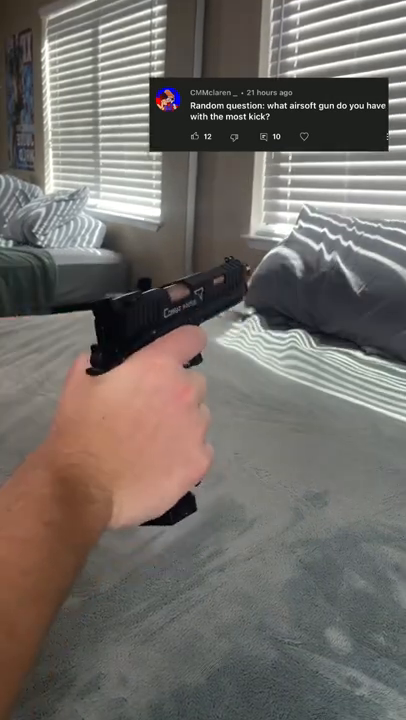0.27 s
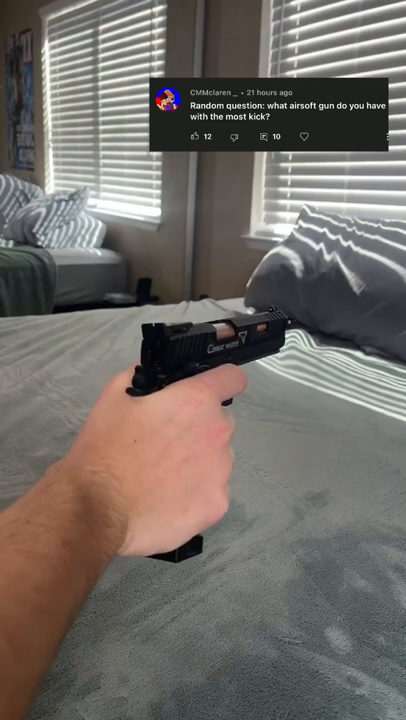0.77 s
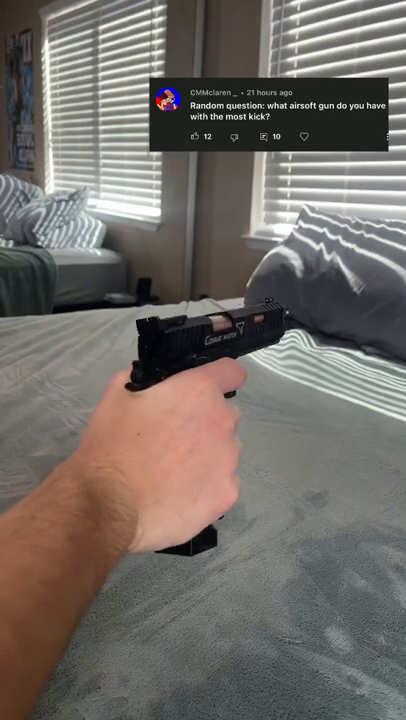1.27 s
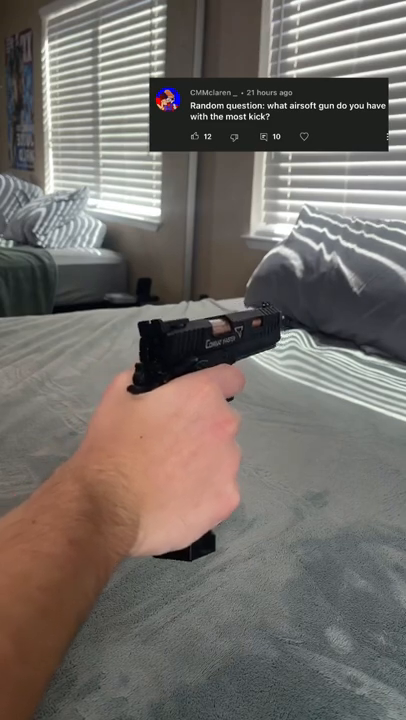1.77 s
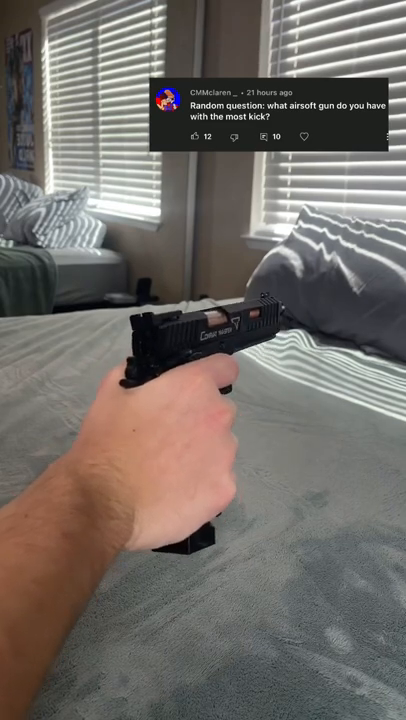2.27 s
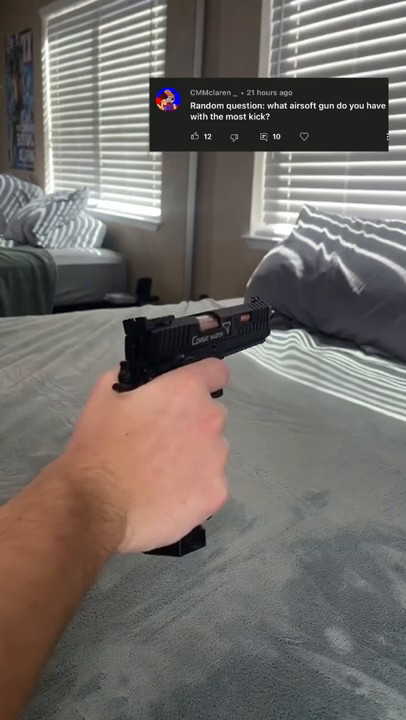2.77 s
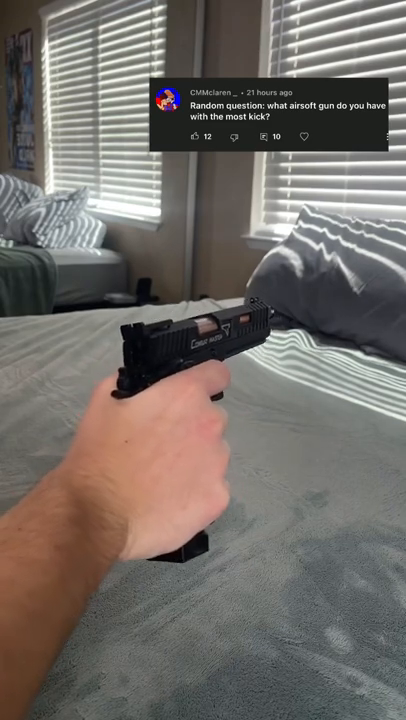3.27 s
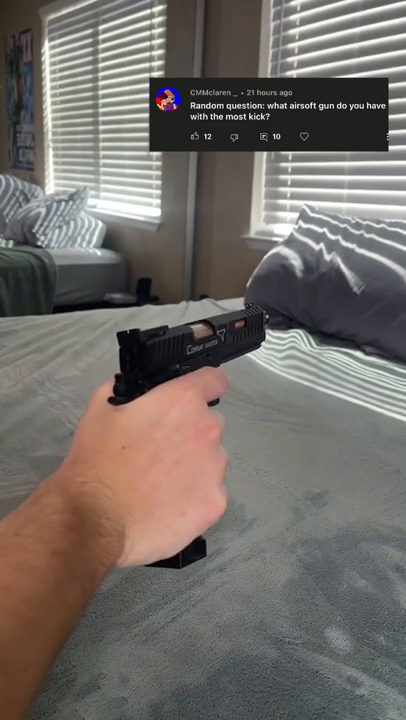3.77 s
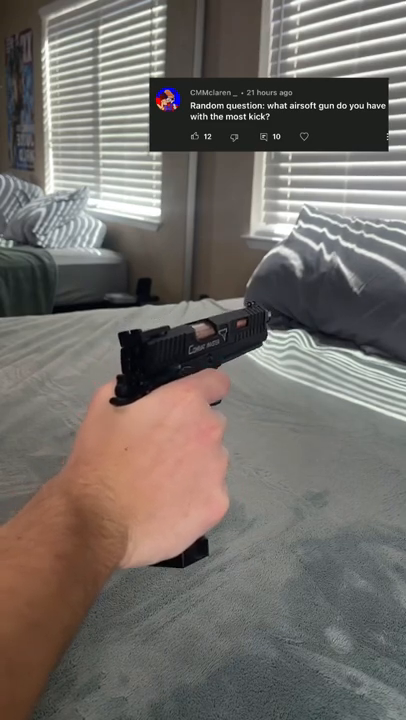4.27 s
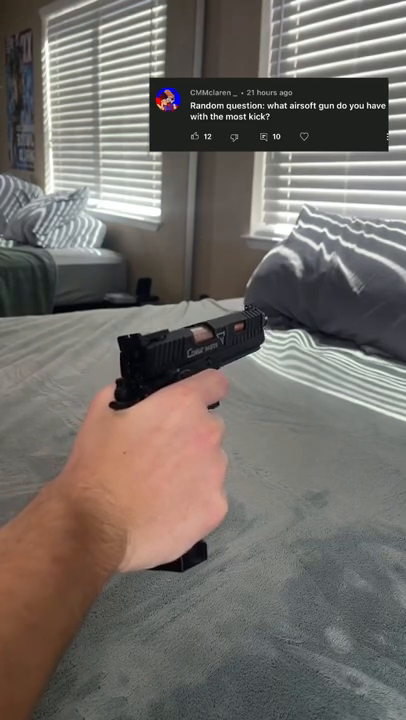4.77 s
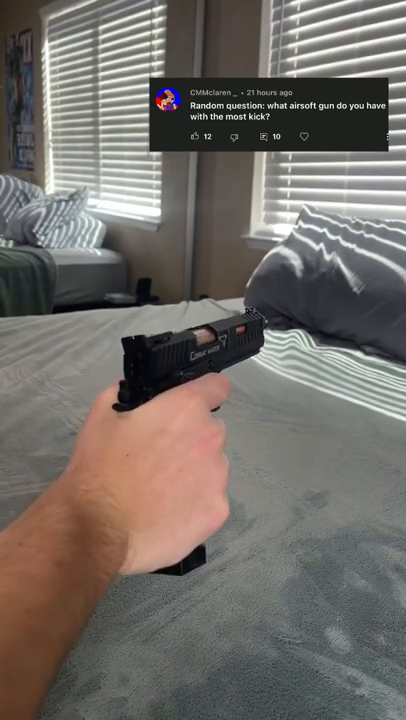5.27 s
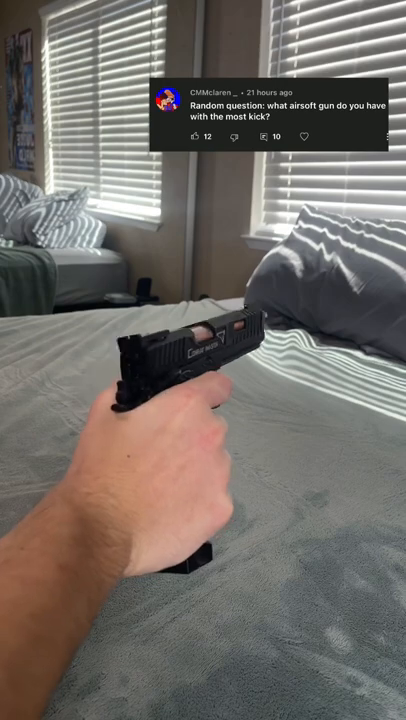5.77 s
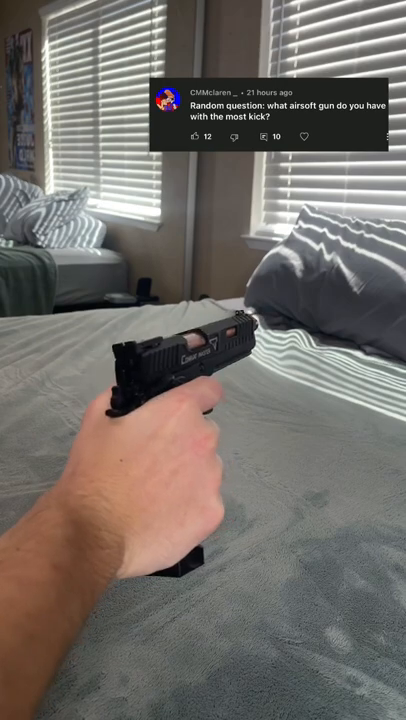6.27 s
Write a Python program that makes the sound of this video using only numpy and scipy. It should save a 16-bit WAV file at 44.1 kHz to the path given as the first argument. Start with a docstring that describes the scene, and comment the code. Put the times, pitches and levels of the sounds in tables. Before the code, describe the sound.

A gas-powered toy pistol is cocked close to the microphone, its slide snapping forward with a metallic clack. After a short pause it fires fifteen single shots that gradually speed up. Each is a sharp pop and tiny hiss of gas with the clack of the slide hitting back and slamming home. Faint trigger ticks fall between shots, and the small room adds a short echo.

```python
"""In a small room, over a bed and close to a phone, a gas-powered toy pistol is cocked and fired 15 times.
A hand pulls back the slide (the moving top of the gun) and lets go; the trigger and small parts tick.
In each shot the hammer clacks, gas hisses and pops out, and the slide hits its rear stop and slams home.
Some puffs of gas strike the microphone and dull it for a moment; a low thump comes as each spell ends.
A faint hush and a deep, wavering hum lie underneath."""
import sys
import numpy as np
from scipy import signal
from scipy.fft import rfft, irfft, next_fast_len
from scipy.io import wavfile

SR = 44100
rng = np.random.default_rng(int(sys.argv[2]) if len(sys.argv) > 2 else 0)


def file_out(sig):
    """Save sig as 16-bit WAV at sys.argv[1]."""
    # one column per channel
    cols = np.atleast_2d(sig).T
    # limit, then scale
    lim = np.clip(cols, -1, 1)
    pcm = np.round(lim * 32767).astype(np.int16)
    wavfile.write(sys.argv[1], SR, pcm)


N = 286650
LEAD = 4410  # extra samples before time zero, so the pull of the slide can echo into the opening
TOTAL = N + LEAD


def amp(db):
    return 10 ** (np.asarray(db) / 20)


def read(points, hz):
    """Looks up a frequency in a table, joining its rows smoothly along a pitch scale."""
    f, value = np.transpose(points)
    return np.interp(np.log(hz + 1), np.log(f + 1), value)


def shape(x, response):
    """Filters a sound; response gives the gain at each frequency."""
    size = next_fast_len(x.shape[-1] + 8192)
    return irfft(rfft(x, size) * response(np.fft.rfftfreq(size, 1 / SR)), size)[..., :x.shape[-1]]


def noise(response):
    """Two unrelated filtered noises with an average (rms) size of 1."""
    x = shape(rng.standard_normal((2, TOTAL)), response)
    return x / x.std()


def add(mix, s, sound):
    """Lays a sound into the mix at s seconds."""
    part = mix[round(s * SR) + LEAD:][:len(sound)]
    part += sound[:len(part)]


# Tone of the still air: (frequency [Hz], level [dB])
HUSH_TONE = [(35, -32.5), (60, -3.5), (107, 0), (160, -11.5), (309, -12.5), (470, -17), (735, -24),
             (950, -22.5), (1340, -31.5), (2200, -33), (4000, -39), (6000, -45.5), (12000, -56.5),
             (15000, -85.5)]
# How loud the hush is: (time [s], level [dB])
HUSH_LEVELS = [(0, -75), (.28, -70.5), (.4, -61.5), (1.1, -60.5), (1.3, -66), (2.0, -71), (3, -74.5),
               (4.2, -77.5), (5, -80.5), (6.5, -76)]
# How loud the hum is: (time [s], level [dB])
HUM_LEVELS = [(0, -81.5), (.38, -83.5), (.54, -68), (1.1, -65.5), (1.4, -69.5), (1.83, -75.5), (2.3, -69),
              (2.8, -73), (3.2, -67.5), (3.7, -68), (4.1, -80), (4.5, -64.5), (4.69, -42.5), (4.98, -81),
              (5.36, -59.5), (5.55, -68.5), (5.75, -67.5), (6.2, -71.5)]

def air():
    """The room's hush, and a hum that wavers because it is a narrow band of noise near 50 Hz."""
    t = (np.arange(TOTAL) - LEAD) / SR
    hush = amp(np.interp(t, *np.transpose(HUSH_LEVELS))) * noise(lambda hz: amp(read(HUSH_TONE, hz)))
    hum = amp(np.interp(t, *np.transpose(HUM_LEVELS))) * noise(lambda hz: 1 / (1 + ((hz - 50) / 9) ** 2))
    return hush + hum


# Kinds of clack: (low part [dB], fade time [s], ringing [dB]). A fade time is how long a 60 dB drop takes.
HAND, HAMMER, VALVE = (-12.5, .018, -6), (-12.5, .024, .2), (-8, .025, 1.5)
REAR, HOME, LIGHT = (-14, .022, -4), (-14, .031), (-9.5, .03, .2)  # each shot sets the ringing of HOME
# The slide pulled back and let go by hand: (time [s], level [dB])
COCKING = [(-.077, 0.5), (.094, -23), (0.109, -9.5), (0.1225, -6.5), (.126, -4.5), (0.129, -7.5)]
# The shots, with delays counted from the hammer: (time [s], hammer [dB], first push of air [dB],
# pop delay [s], pop [dB], pop length [s], pop rebound [0-1], valve [dB],
# rear stop delay [s], rear stop [dB], slide home delay [s], slide home [dB], its ringing [dB])
SHOTS = [(1.1493, -18, -5, .0098, -3, 0.0011, 0.5, -6, .0178, -24, .0684, -5.5, -14.5),
         (1.687, -12.5, -17, .0127, -5.5, 0.00051, 0.5, -11, .022, -22, .0643, -8.5, -0.5),
         (2.1515, -15.5, -16, .0131, -8, .0006, .9, -16, .0201, -9.5, .0556, -14, 7.5),
         (2.5861, -9.5, -16.5, .0115, -5.5, .00029, 1, -13.5, .021, -11, .0553, -12, 5.5),
         (3.028, -7.5, -16.5, .011, -9, 0.00032, 0.4, -11.5, 0.023, -11.5, .0548, -10.5, 6),
         (3.42, -13, -18.5, .013, -10, .00074, 0.7, -11.5, .0203, -9, .054, -11.5, 3.5),
         (3.8317, -8, -15.5, .0117, -9, 0.0007, .6, -12, .022, -8.5, .0555, -10.5, 5),
         (4.2251, -11, -17.5, .0127, -6.5, 0.00042, 1, -10, .023, -9.5, .0563, -9, 2.5),
         (4.5423, -10.5, -20.5, .0127, -7.5, 0.00042, .7, -8, .0234, -11.5, 0.0558, -8.5, 3),
         (4.8813, -7, -20.5, .0142, -7.5, .00069, 0, -5, .024, -19, .067, -9.5, -1),
         (5.1654, -6.5, -18, .0134, -7, .00035, .6, -10.5, .0233, -8, .0575, -7, 2),
         (5.447, -9.5, -18, .013, -5.5, .00037, 1, -16, 0.0233, -7, .0582, -9, 8),
         (5.7219, -10, -14.5, .0158, -8.5, 0.00033, .3, -14.5, .0263, -6.5, .0615, -10, -2),
         (6.0426, -10.5, -18.5, .0162, -2.5, .0008, .8, -9.5, .025, -15.5, .0698, -7.5, -14),
         (6.3406, -7.5, -16, .0166, -8, 0.00038, .84, -9, 0.029, -8.5, .0595, -8.5, 8.5)]

def clacks():
    """Lists every metal hit as (time [s], level [dB], low part [dB], fade time [s], ringing [dB])."""
    hits = [(s, db, *HAND) for s, db in COCKING]
    for s, hammer_db, _, pop, _, _, _, valve_db, rear, rear_db, home, home_db, ring_db in SHOTS:
        hits += [(s, hammer_db, *HAMMER),
                 (s + pop - .0026, valve_db, *VALVE),  # just before the pop
                 (s + rear, rear_db, *REAR),
                 (s + home - .015, home_db - 15, *LIGHT),  # the slide catches the next pellet
                 (s + home, home_db, *HOME, ring_db),
                 (s + home + .012, home_db - 13, *LIGHT)]  # and bounces once
    return hits


def rattle(hits, rise_s):
    """Loudness over time of hits (time [s], level [dB], fade time [s]): each jumps up, then dies away."""
    power, t = np.zeros(TOTAL), np.arange(4000) / SR
    for s, db, fade in hits:
        add(power, s, (amp(db - 60 * t / fade) * (1 - np.exp(-t / rise_s))) ** 2)
    return np.sqrt(power)


# Tone of metal hitting metal: (frequency [Hz], level [dB])
METAL_TONE = [(350, -49.5), (700, -28.5), (2200, 4.5), (3040, -0.5), (4800, -7.5), (6800, -7), (8900, -3),
              (11000, -2.5), (13000, -23.5)]
# Notes the slide and frame ring at: (frequency [Hz], when cocked [dB], when fired [dB], fade time [s])
METAL_NOTES = [(1850, -12, -16, .04), (2090, -11, -23, .13), (2630, -14, -4, .018), (3060, -13, -3, .022),
               (4290, -9, -19, .08), (5800, -12, -16, .04), (6850, -8, -12, .025), (10700, -10, -13, .012)]
CLACK_RISE_S, COCKED_BY_S, RING_DB = .0009, .6, -18.5

def slide_and_hammer():
    """Each metal hit is a burst of noise, split high and low, and also sets the slide and frame ringing."""
    hits = clacks()
    high = rattle([(s, db, fade) for s, db, _, fade, _ in hits], CLACK_RISE_S)
    low = rattle([(s, db + low_db, fade) for s, db, low_db, fade, _ in hits], CLACK_RISE_S)
    knock = rattle([(s, db + low_db + ring_db, .012) for s, db, low_db, _, ring_db in hits], .00016)
    low_share = lambda hz: 1 / (1 + (hz / 4500) ** 6)
    grit = amp(2.05 * np.repeat(rng.standard_normal(TOTAL // 16 + 1), 16)[:TOTAL])  # uneven tiny contacts
    metal = high * noise(lambda hz: amp(read(METAL_TONE, hz)) * (1 - low_share(hz)))
    metal += low * noise(lambda hz: amp(read(METAL_TONE, hz)) * low_share(hz))
    knocks = knock * rng.standard_normal((2, TOTAL))
    by_hand = np.arange(TOTAL) < LEAD + COCKED_BY_S * SR
    t = np.arange(8000) / SR
    for hz, hand_db, fired_db, fade in METAL_NOTES:
        ring = amp(-60 * t / fade) * np.sin(2 * np.pi * hz * t)
        struck = knocks * amp(np.where(by_hand, hand_db, fired_db) + RING_DB)
        metal += signal.oaconvolve(struck, ring[None], axes=1)[:, :TOTAL]
    return metal * grit


# How long the room's echo lasts: (frequency [Hz], fade time [s])
ECHO_FADES = [(100, 0.078), (300, 0.18), (800, 0.49), (2000, 0.53), (5000, 0.53), (9000, 0.45),
              (13000, 0.28)]
# Tone of the echo: (frequency [Hz], level [dB])
ECHO_TONE = [(100, -6.5), (300, -2.5), (700, -4), (1100, -2), (2500, -3), (6000, -0.5), (9000, -6),
             (11000, -0.5), (12500, -12), (14000, -26)]

def room_echo(x):
    """Many small reflections at random times; each pitch dies away at its own speed."""
    taps = np.zeros((2, SR))
    at = np.arange(100, SR - 20, 20) + rng.integers(0, 20, (2, (SR - 101) // 20))
    np.put_along_axis(taps, at, rng.choice([-1., 1.], at.shape), 1)
    hz, t, bands = signal.stft(taps, SR, nperseg=256)
    early = amp(12 - 60 * t / .23)  # bedding soaks up the first echoes fast
    late = amp(-60 * (t / read(ECHO_FADES, hz)[:, None]) ** 1.25)  # falls faster towards the end
    tail = signal.istft(bands * (early + late) * amp(read(ECHO_TONE, hz))[:, None], SR, nperseg=256)[1]
    return signal.fftconvolve(x, tail / np.linalg.norm(tail[0]), axes=1)[:, :TOTAL]


# Ticks of the trigger and small parts: (time [s], level [dB], top frequency [Hz])
TRIGGER_TICKS = [(0.4375, -50, 3000), (0.9932, -61, 2500), (1.0292, -46.5, 9000), (1.064, -61, 5000),
                 (1.6282, -50.5, 9000), (2.0966, -48.5, 9000), (2.547, -45, 11000), (2.9868, -46.5, 11000),
                 (3.374, -49, 11000), (3.8, -46, 11000), (4.186, -48.5, 11000), (4.831, -58.5, 11000),
                 (6.0065, -53, 11000)]

def trigger():
    """Small parts tick: tiny bursts of noise, each with its own brightness."""
    out, t = np.zeros((2, TOTAL)), np.arange(1300) / SR
    for s, db, top_hz in TRIGGER_TICKS:
        band = signal.butter(2, [900, top_hz], "band", fs=SR)
        tick = signal.lfilter(*band, rng.standard_normal((2, len(t))))
        loudness = amp(db - 60 * t / .014) * (1 - np.exp(-t / .00011))
        for side in (0, 1):
            add(out[side], s, loudness * tick[side] / tick.std())
    return out


# Tone of the escaping gas: (frequency [Hz], level [dB])
GAS_TONE = [(200, -23), (600, -4), (2000, -2), (5000, -3.5), (9000, -0.5), (11500, -4.5), (13500, -9)]
BEFORE_HAMMER_S, AFTER_POP_S = .006, .0015  # the valve is open between these two moments
HISS_DB, COOLING_DB_PER_SHOT = -18.5, -.3654

def gas_hiss():
    """Gas hisses while the valve is open, a little weaker each shot as the tank cools."""
    flow = np.zeros(TOTAL)
    for shot, (s, _, _, pop, *_) in enumerate(SHOTS):
        open_s = BEFORE_HAMMER_S + pop + AFTER_POP_S
        progress = np.arange(0, 1.6, 1 / (open_s * SR))  # the valve shuts at 1
        opening = np.minimum(progress / .35, 1) ** 1.5
        closing = amp(-45 * np.maximum(progress - 1, 0))
        add(flow, s - BEFORE_HAMMER_S, amp(HISS_DB + shot * COOLING_DB_PER_SHOT) * opening * closing)
    return flow * noise(lambda hz: amp(read(GAS_TONE, hz)))


# Low, soft thumps, most of them as a dull spell ends: (time [s], strength [dB], length [s])
LOW_THUMPS = [(1.223, -25, .0021), (1.758, -27.5, 0.0031), (2.169, -15.5, .0036), (4.574, -19.5, 0.0079),
              (4.952, -24, 0.0033), (6.119, -25.5, 0.0032)]
# Tone of the pops and thumps: (frequency [Hz], level [dB])
PULSE_TONE = [(60, 2.5), (130, -1.5), (290, 3), (450, 1), (700, -4), (1050, 0.5), (1600, -1.5), (4000, 2.5)]
PUSH_DELAY_S, PUSH_LENGTH_S, PUSH_REBOUND = .0026, .00052, 1  # the first push of air, after the hammer
THUMP_REBOUND, REBOUND_STRETCH = .2, 3

def pops_and_thumps():
    """Single pulses: short ones pop, long ones thump. A slower rebound cancels some of the bass."""
    out, t = np.zeros(TOTAL), np.arange(3000) / SR
    pulses = [(s, db, length, THUMP_REBOUND) for s, db, length in LOW_THUMPS]
    for s, _, push_db, pop, pop_db, length, rebound, *_ in SHOTS:
        pulses += [(s + PUSH_DELAY_S, push_db, PUSH_LENGTH_S, PUSH_REBOUND),
                   (s + pop, pop_db, length, rebound)]
    for s, db, length, rebound in pulses:
        rise = 1 - np.exp(-t / (.18 * length))
        spring_back = rebound / REBOUND_STRETCH * np.exp(-t / (REBOUND_STRETCH * length))
        add(out, s, amp(db + 12) * rise * (np.exp(-t / length) - spring_back))
    return shape(out, lambda hz: amp(read(PULSE_TONE, hz)))


# Moments when a puff dulls the microphone: (time [s], length [s], dip in level afterwards [dB])
DULL_SPELLS = [(1.156, 0.071, -6.5), (1.698, 0.058, -15.5), (4.893, 0.06, -8), (6.06, 0.057, -11)]
# How much each pitch is dulled: (frequency [Hz], share of DULL_DB [0-1])
DULL_SHARES = [(300, 0.086), (1500, .4), (4400, 0.27), (5600, 0.67), (12000, 0.94)]
DULL_DB, RECOVERY_S = -26, .045

def dulled_microphone(x):
    """A hard puff cuts the high notes at once; afterwards the whole level dips and swells back."""
    hz, t, bands = signal.stft(x, SR, nperseg=128, noverlap=96)
    dull_db, dip_db = np.zeros((2, len(t)))
    for s, length, after_db in DULL_SPELLS:
        age = t - LEAD / SR - s
        dull_db += DULL_DB * np.clip(age / .0064, 0, 1) * np.clip((length - age) / .0055, 0, 1)
        dip_start = np.clip(1 + (age - length) / .0047, 0, 1)
        dip_db += after_db * dip_start * np.exp(-(abs(age - length) / RECOVERY_S) ** .79)
    bands = bands * amp(dull_db * read(DULL_SHARES, hz)[:, None] + dip_db)
    return signal.istft(bands, SR, nperseg=128, noverlap=96)[1][:, :TOTAL]


# How the phone's two microphone openings compare:
# (frequency [Hz], likeness [0-1], left ahead by [radians], left louder by [dB])
MIC_OPENINGS = [(0, .99, 0, 0), (125, .98, -.1, -.1), (250, .97, -.3, -.1), (500, .92, -.55, -.8),
                (1000, .76, -.5, -2.2), (1700, .95, -.15, -.3), (2300, .95, .2, -.5), (3200, .65, 1.0, -4),
                (4500, .7, 2.5, -1.5), (5200, .65, 4, 0), (5800, .97, 6.2, .8), (6300, .92, 6.5, .6),
                (7900, .88, 8.55, .4), (8900, .99, 9.42, .1), (9500, .97, 9.55, .2), (11000, .93, 11.2, 0),
                (12100, .95, 12.45, .1), (13600, .95, 12.55, 0), (14600, .7, 15.5, -.5)]

def left_and_right(pair, pulses):
    """The right opening hears partly the same sound as the left, slightly shifted. Both get the pulses."""
    f, likeness, ahead, louder_db = np.transpose(MIC_OPENINGS)
    alike = lambda hz: np.interp(hz, f, likeness)
    shift = lambda hz: np.exp(-1j * np.interp(hz, f, ahead)) * amp(-np.interp(hz, f, louder_db))
    right = shape(pair[0], alike) + shape(pair[1], lambda hz: np.sqrt(1 - alike(hz) ** 2))
    return np.array([pair[0] + pulses, shape(right + pulses, shift)])


def scene():
    """The gun and its echo, dulled now and then, with the air, pops and thumps added."""
    gun = slide_and_hammer() + trigger() + gas_hiss()
    pulses = pops_and_thumps()
    echo = amp(-10) * room_echo(gun) + amp(-13.5) * room_echo(np.array([pulses, pulses]))
    return left_and_right(dulled_microphone(gun + echo) + air(), pulses)[:, LEAD:]


# How the microphone loses the very highest notes: (frequency [Hz], level [dB])
MIC_TONE = [(11800, 1.48), (12600, -1.5), (13600, -15), (14500, -27), (16500, -40)]
BASS_CUT_HZ, TOP_HZ, SOFT_LIMIT = 70, 16500, .9

def record(dry):
    """The phone thins the bass, rounds off loud peaks and cuts the highest treble."""
    late_lows = lambda hz: np.exp(-7.5j * np.log((hz + 15) / 16000))  # turns a pop into a falling chirp
    wet = shape(dry, lambda hz: late_lows(hz) / (1 + (BASS_CUT_HZ / (hz + 1)) ** 2))
    wet = wet / (1 + (wet / SOFT_LIMIT) ** 4) ** .25
    wet = shape(wet, lambda hz: amp(read(MIC_TONE, hz)))
    treble_cut = signal.firwin(511, TOP_HZ, window=("kaiser", 9), fs=SR)
    return signal.oaconvolve(wet, treble_cut[None], "same")


dry = scene()
out = record(dry)
file_out(out)
```